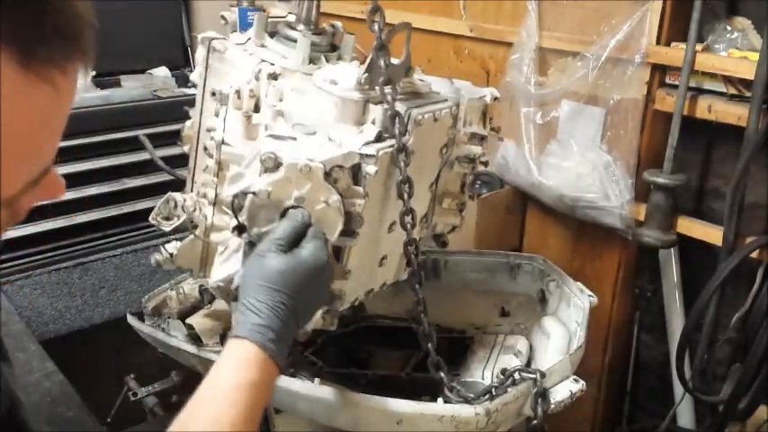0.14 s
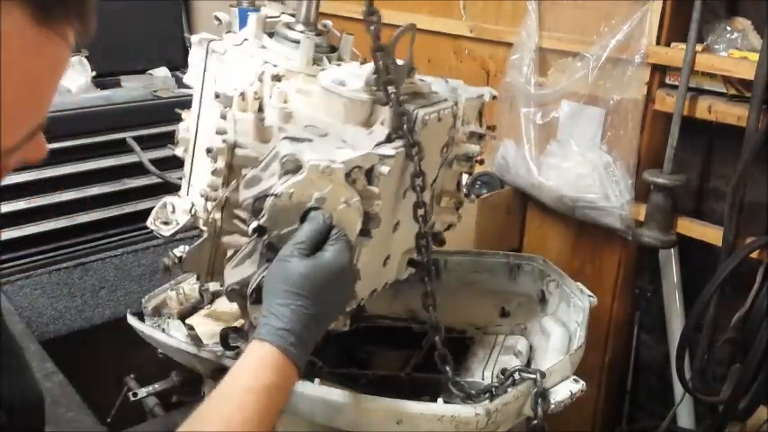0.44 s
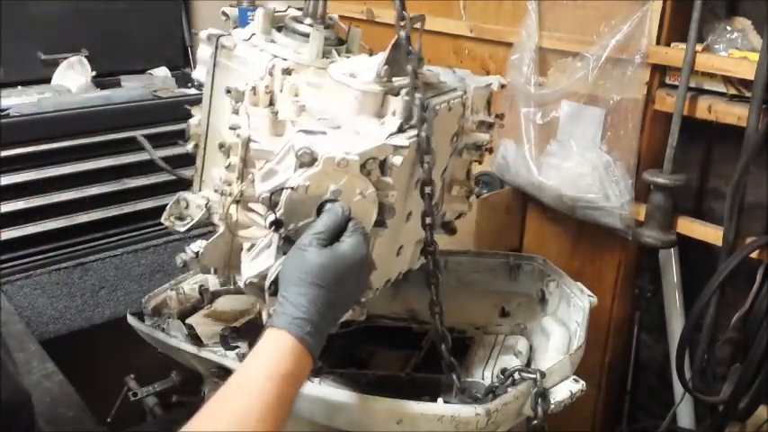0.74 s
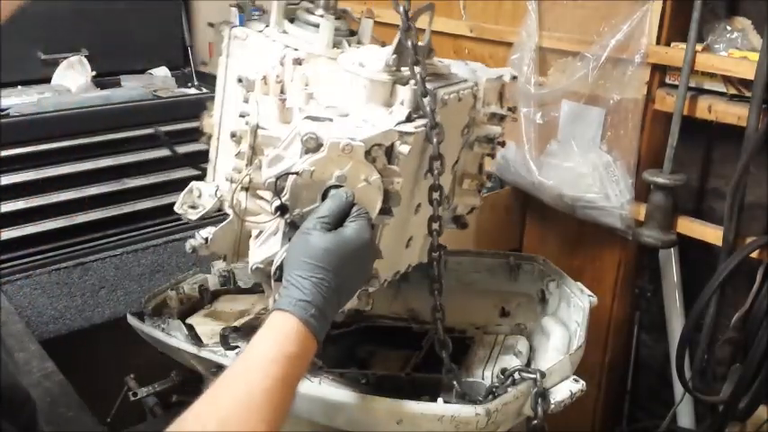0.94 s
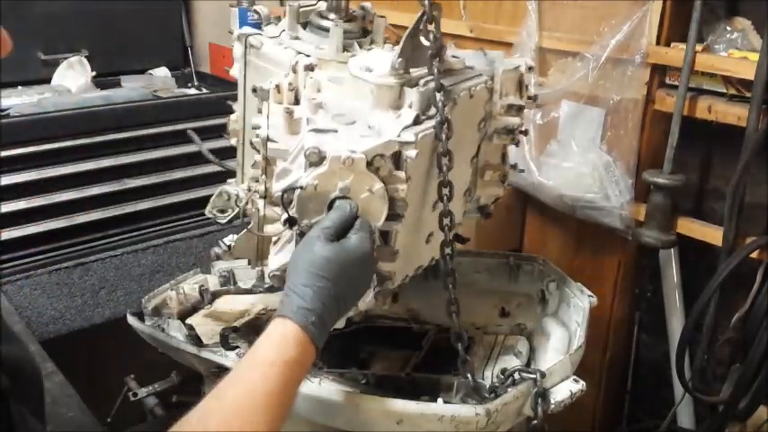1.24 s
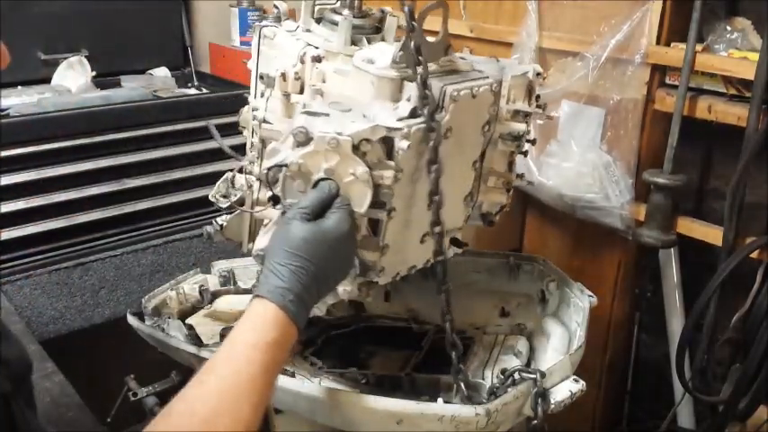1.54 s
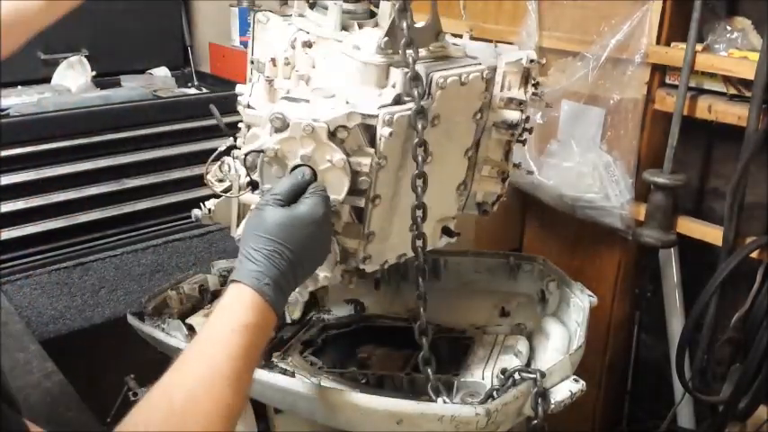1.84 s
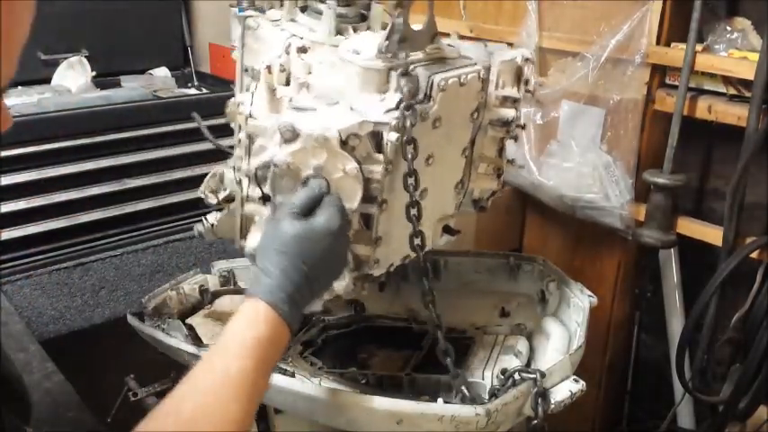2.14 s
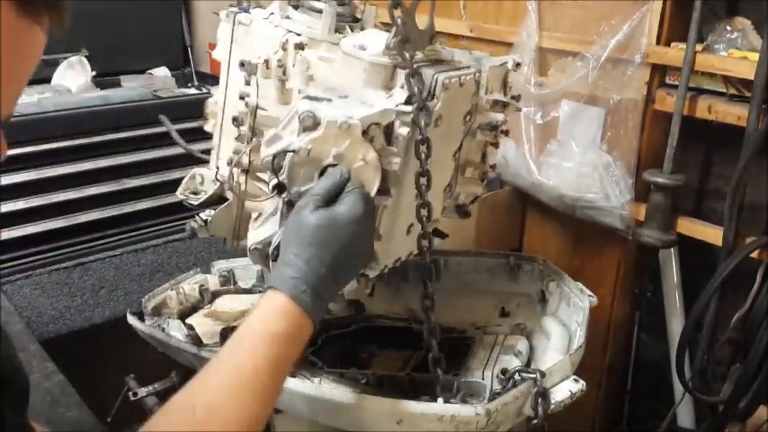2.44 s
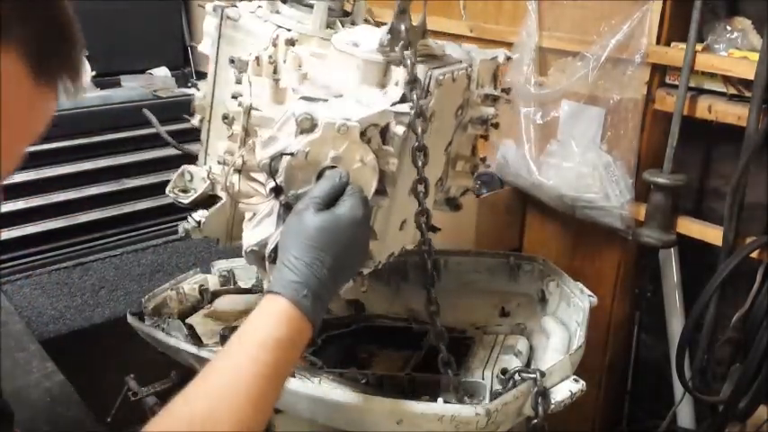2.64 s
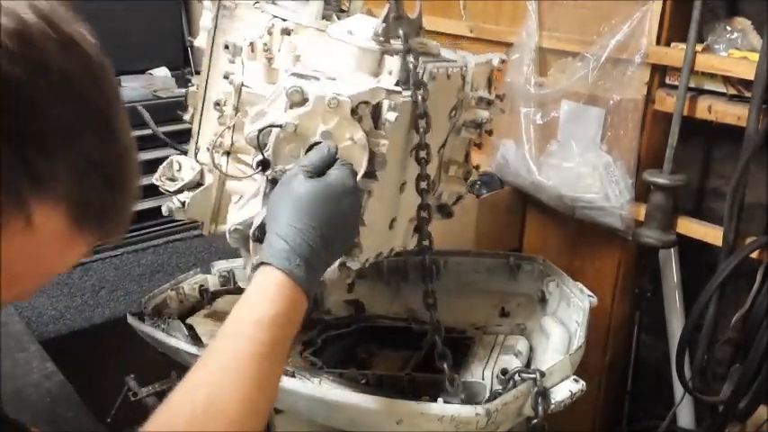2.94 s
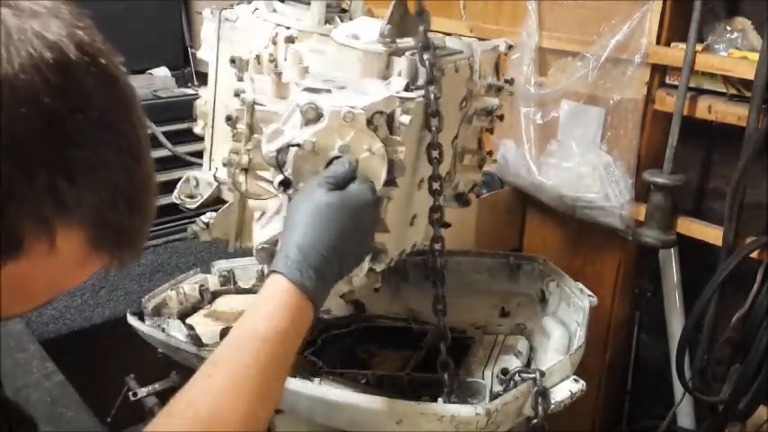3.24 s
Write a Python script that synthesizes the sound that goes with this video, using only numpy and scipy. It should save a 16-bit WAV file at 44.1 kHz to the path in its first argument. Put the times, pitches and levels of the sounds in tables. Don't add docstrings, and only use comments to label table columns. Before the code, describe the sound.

A chain hoist ratchets under load. A faint metallic tail opens; a low beam thump at 0.15 s leads to sharp clinks from 0.3 to 0.6, loudest first. Links rattle at 0.8-1.0, snap at 1.15-1.45, clink and rattle at 1.7-1.9, crack at 2.1-2.45, rattle at 2.7-2.9, and clank at 3.2. Dull jolts rumble beneath each stroke; small garage, short tail, quiet floor.

```python
import sys
import numpy as np
from scipy import signal
from scipy.fft import rfft, irfft
from scipy.io import wavfile
from scipy.ndimage import uniform_filter1d

SR = 44100
rng = np.random.default_rng(int(sys.argv[2]) if len(sys.argv) > 2 else 0)


def file_out(sig):
    cols = np.atleast_2d(sig).T
    lim = np.clip(cols, -1, 1)
    pcm = np.round(lim * 32767).astype(np.int16)
    wavfile.write(sys.argv[1], SR, pcm)


def undo_db(level):
    steps = np.asarray(level, float) / 20
    return 10 ** steps


N = 149940

# pitch_hz, level_db, t60_s
LINK_MODES = [(1060, -15, 0.26), (2730, -3, 0.23), (3200, -10, 0.23), (4270, -15, 0.3), (5700, -20, 0.15),
              (7350, -4.5, 0.23), (9280, -15, 0.31)]
# pitch_hz, level_db
STEEL = [(290, 3.5), (500, -8.5), (1480, -5), (2040, -10), (2540, 1.5), (3110, -7), (5240, -0.5),
         (14900, -13), (16000, -52)]


def evened(x):
    return x / np.sqrt(np.mean(x ** 2) + 1e-20)


def read(points, hz):
    f, value = np.transpose(points)
    return np.interp(np.log(hz + 1), np.log(f + 1), value)


def add(mix, start_s, sound):
    part = mix[round(start_s * SR):][:len(sound)]
    part += sound[:len(part)]


def high(x, hz):
    return signal.sosfilt(signal.butter(3, hz, "high", fs=SR, output="sos"), x)


def coloured(count, points, bright_db=0, lead_hz=5500, focus_db=0, patch_db=0):
    hz = np.fft.rfftfreq(count, 1 / SR)
    tilt = bright_db * np.clip((hz - 6500) / 3000, 0, 1)
    tilt = tilt + focus_db * np.exp(-((hz - lead_hz) / 900) ** 2)
    luck = rng.standard_normal(len(hz))
    broad = evened(uniform_filter1d(luck, 120))
    fine = evened(uniform_filter1d(luck[::-1], 12))
    tilt = tilt + patch_db * evened(broad + fine)
    spectrum = rfft(rng.standard_normal(count)) * undo_db(read(points, hz) + tilt)
    return evened(irfft(spectrum, count))


def bell(pitch_hz, level_db, t60_s):
    t = np.arange(9000) / SR
    onset = 1 - np.exp(-t / 0.0011)
    return undo_db(level_db - 60 * t / t60_s) * np.sin(2 * np.pi * pitch_hz * t) * onset


def blow(pitch_hz, level_db, width_s):
    t = np.arange(600) / SR
    pulse = (t / width_s) * np.exp(1 - t / width_s)
    return undo_db(level_db) * np.sin(2 * np.pi * pitch_hz * t) * pulse


def strike(modes, peak_db, bright_db, rattle_s, clatter_db, clatter_t60, crack_db, share=0.077,
           lead_hz=5500, focus_db=0, grain_db=3):
    t = np.arange(9000) / SR
    ring_s, smear, spread_db = 0.036, 0.025, 13
    group = modes * 4
    luck = np.clip(rng.standard_normal((len(group), 2)), -1, 1)
    ring = np.zeros(len(t))
    for (hz, db, t60), (louder, sharper) in zip(group, luck):
        decay = undo_db(db + spread_db * louder - 60 * t / min(t60, ring_s))
        ring += decay * np.sin(2 * np.pi * hz * (1 + smear * sharper) * t)
    ring *= 1 - np.exp(-t / 0.00029)

    rebounds = rng.standard_normal(2000) * (rng.random(2000) < share)
    contacts = 0.5 * rebounds * np.exp(-t[:2000] / rattle_s)
    contacts[0] = 1
    rung = signal.fftconvolve(ring, contacts)[:len(t)]

    clatter = undo_db(clatter_db - 60 * np.maximum(t - rattle_s, 0) / clatter_t60)
    crack = undo_db(crack_db - 60 * t / 0.008)
    noise = coloured(len(t), STEEL, bright_db, lead_hz, focus_db, patch_db=2.8)
    grains = undo_db(grain_db * evened(uniform_filter1d(rng.standard_normal(len(t)), 60)))
    noise = noise * grains * (clatter + crack) * np.minimum(t / 0.00034, 1)
    sound = rung / abs(rung).max() + noise
    return undo_db(peak_db) * sound / abs(sound).max()


def quiet_floor():
    # pitch_hz, level_db
    floor_points = [(15, 11), (25, 2.5), (123, 6), (641, -4), (2760, -13), (3920, -23.5), (5880, -16),
                    (14800, -52), (16000, -26)]
    return undo_db(-41.5 - 1.5) * coloured(N, floor_points)


def earlier_clank():
    t = np.arange(N) / SR
    return undo_db(-32.5 - 60 * t / 0.5) * coloured(N, STEEL, bright_db=-15.5)


def garage(x):
    # pitch_hz, t60_s
    decay_points = [(200, 0.52), (1000, 0.46), (3000, 0.46), (6000, 0.38), (12000, 0.25)]
    taps = np.zeros(SR)
    at = np.arange(200, SR - 20, 20)
    taps[at + rng.integers(0, 20, len(at))] = rng.choice([-1., 1.], len(at))
    hz, t, bands = signal.stft(taps, SR, nperseg=256)
    decay = undo_db(-60 * t / read(decay_points, hz)[:, None])
    tail = signal.istft(bands * decay, SR, nperseg=256)[1]
    return signal.fftconvolve(x, tail / np.linalg.norm(tail))[:N]


def early_echoes(direct):
    # start_s, level_db
    reflections = [
        (.0042, -12),
        (.009, -11.5),
    ]
    out = np.zeros(N)
    for start_s, level_db in reflections:
        add(out, start_s, undo_db(level_db) * direct)
    return out


def shudders():
    # start_s, peak_db, pitch_hz
    beam_shudders = [(0.159, -21, 164.5), (0.184, -32, 158), (0.203, -25, 143), (0.222, -24.5, 145),
                     (0.258, -21, 205), (0.286, -28, 168), (0.306, -34, 195), (0.324, -29.5, 204),
                     (0.354, -28.5, 181.5), (0.617, -22.5, 159), (0.629, -24.5, 154), (0.645, -25, 178),
                     (1.079, -29.5, 119), (1.176, -32.0, 139), (1.232, -27.5, 141), (1.332, -27.5, 190),
                     (1.56, -23, 215), (1.59, -23.5, 210), (1.626, -30.5, 213), (2.061, -22, 114),
                     (2.083, -24.5, 155), (2.115, -24.5, 134), (2.155, -31, 138), (2.181, -27.5, 130),
                     (2.201, -32.5, 167), (2.214, -29, 174), (2.233, -27, 182), (2.257, -46, 202),
                     (2.274, -30, 147), (2.321, -35, 174.6), (2.56, -29, 178), (2.589, -22.5, 144.6),
                     (2.605, -30, 164), (2.837, -30.5, 155), (3.043, -22, 129), (3.064, -28, 107),
                     (3.102, -29, 142), (3.135, -29.5, 183), (3.166, -30.5, 117), (3.249, -29.0, 119),
                     (.149, -22.5, 131.6),
    ]
    events = beam_shudders
    t, out = np.arange(3000) / SR, np.zeros(N)
    swell_s = 0.00902
    swell = ((t / swell_s) * np.exp(1 - t / swell_s)) ** 2
    for (start_s, peak_db, pitch_hz), turns in zip(events, rng.random((len(events), 3))):
        lump = np.zeros(len(t))
        for (ratio, level_db), turn in zip([(0.65, -4.5), (1.0, -1), (1.9, -11.5)], turns):
            lump += undo_db(level_db) * np.sin(2 * np.pi * (pitch_hz * ratio * t + turn))
        add(out, start_s - 1.502 * swell_s, undo_db(peak_db - 3.5) * swell * lump)
    return out


def beam():
    # start_s, level_db, shake_s, upper_modes_db, rub_db
    strokes = [(.142, -30, 0.21, 4, -42.5), (0.603, -33, 0.073, -7, -68), (1.065, -35.5, .17, -9, -60),
               (1.3, -50, 0.2, 21, -44), (1.551, -29, 0.037, 15, -47), (2.051, -31.5, 0.18, 1.5, -43.5),
               (2.22, -39, 0.164, 10, -53), (2.552, -30, 0.035, 14, -48), (2.719, -49, 0.22, -12, -45),
               (3.03, -30.5, 0.13, -3.5, -44.5), (3.242, -36, 0.033, 10, -44)]
    # pitch_hz, level_db, t60_s
    beam_modes = [(92.5, 1, 0.23), (155, -5, 0.064), (209, 3.5, 0.045), (260, -4.5, 0.021),
                  (443, -18, 0.057)]
    # pitch_hz, level_db
    rub_points = [(350, 12), (550, 0.5), (1100, 8), (2200, -15.5), (4000, -42)]
    t, out = np.arange(SR // 2) / SR, np.zeros(N)
    for start_s, level_db, shake_s, upper_db, rub_db in strokes:
        hold = np.minimum(t / 0.0021, 1) * np.clip((shake_s - t) / 0.016, 0, 1)
        body = np.zeros(len(t))
        for hz, mode_db, t60 in beam_modes:
            decay = undo_db(mode_db + upper_db * (hz > 120) - 60 * t / t60)
            body += decay * np.sin(2 * np.pi * hz * t) * (1 - np.exp(-t / 0.001))
        force = rng.standard_normal(len(t)) * hold
        force[0] += 10
        shake = signal.fftconvolve(force, body / np.linalg.norm(body))[:len(t)]
        grains = undo_db(3 * evened(uniform_filter1d(rng.standard_normal(len(t)), 300)))
        rub = hold * grains * coloured(len(t), rub_points)
        add(out, start_s, undo_db(level_db - 4.5) * shake + undo_db(rub_db) * rub)
    return out


def knocks(mix):
    # start_s, peak_db, centre_hz
    lever_stops = [(0.1335, -21.5, 2660), (.143, -36, 1500), (0.1749, -25, 1390), (0.19, -31, 1230),
                   (0.202, -36, 1120), (1.126, -35, 1660), (1.5505, -36, 2390), (2.062, -26, 1080),
                   (2.548, -20.5, 1960), (2.556, -34.5, 1500), (2.678, -61, 1660), (3.077, -33, 1010),
                   (2.406, -31, 1800)]
    # pitch_hz, level_db
    housing_points = [(300, -11), (900, -5), (2800, -4), (3600, -22), (5600, -10.5), (8000, -25),
                      (16000, -60)]
    t = np.arange(4000) / SR
    decay = undo_db(-60 * t / 0.019) + undo_db(-6 - 60 * t / 0.051)
    shape = decay * np.minimum(t / 0.00014, 1)
    for start_s, peak_db, centre_hz in lever_stops:
        thud = shape * coloured(len(t), housing_points, lead_hz=centre_hz, focus_db=3)
        add(mix, start_s - 0.001, undo_db(peak_db - 7) * thud)
        add(mix, start_s - 0.001, blow(centre_hz, peak_db - 5.5, 0.0011))


def ticks(mix):
    # start_s, peak_db, lead_hz, bright_db
    touches = [
        (0.4326, -20, 6920, -30),
        (0.7553, -30.5, 3300, -23),
        (1.5748, -36, 7030, -12),
        (2.0476, -28, 6140, -16),
        (2.0924, -21, 5890, -16),
        (2.678, -38, 6170, -1),
        (3.001, -34, 5760, -26),
        (3.027, -24, 4970, -16),
        (3.0764, -28.5, 6100, -14.5),
        (3.3558, -30.5, 5780, -15),
    ]
    for start_s, peak_db, lead_hz, bright_db in touches:
        tilt_db = np.clip(bright_db + 7, -15, 6)
        modes = LINK_MODES + [(lead_hz, 3, 0.08)]
        add(mix, start_s - 0.001, strike(modes, peak_db, tilt_db, 0.0077, -9.5, 0.095, -30))


def scrapes(mix):
    # start_s, peak_db, low_ring_db, bright_db, rattle_s
    drags = [(0.7776, -12.5, -8, -19, 0.019), (0.8492, -14, -32, -16.5, 0.02),
             (0.907, -13, -18, -16, 0.017), (0.9988, -13, -38, -16.5, 0.015),
             (1.7293, -13, -8.5, -19.5, 0.015), (1.7851, -15.5, -9, -14.5, 0.013),
             (1.8324, -11, -36, -18.5, 0.011), (1.8934, -15.5, -3, -16.5, 0.0039),
             (2.7047, -13, -2.5, -19, 0.012), (2.7635, -14.5, -32, -18, 0.014),
             (2.8345, -15.5, -31, -38, 0.0081), (2.8709, -24.5, -31, -22, 0.0069)]
    # pitch_hz, level_db, t60_s
    wheel_modes = [(1624, -11, 0.13), (2620, -3, 0.16), (3455, -1.5, 0.096), (4270, -21, 0.16),
                   (4860, -7.5, 0.31), (5400, -29, 0.24), (8000, -8, 0.12), (9100, -9, 0.39)]
    low_hz = 2450
    for start_s, peak_db, low_db, bright_db, rattle_s in drags:
        ring_db = peak_db + low_db
        add(mix, start_s, bell(low_hz, ring_db - 7.5, 0.1))
        add(mix, start_s, bell(0.96 * low_hz, ring_db - 2, 0.03))
        add(mix, start_s, bell(1470, peak_db - 34, 0.36))
        add(mix, start_s, strike(wheel_modes, peak_db, bright_db + 7.5, max(rattle_s, 0.001), -2.9, 0.085,
                                 -14, share=0.029, grain_db=2.5))


def contacts(mix):
    # start_s, peak_db, pitch_hz
    touches = [(0.7808, -16, 3320), (0.865, -19, 5200), (0.91, -16, 2620), (1.0019, -16, 5040),
               (1.2492, -9, 5290), (1.6366, -38, 5730), (1.794, -21, 6260), (1.815, -9.5, 6060),
               (1.823, -18, 5200), (2.0547, -26.5, 6100), (2.2025, -39, 5800), (2.266, -13, 5370),
               (2.296, -23, 2750), (2.8707, -23, 4410), (3.2065, -14, 6100)]
    for start_s, peak_db, pitch_hz in touches:
        at = start_s - 0.0006
        add(mix, at, blow(pitch_hz, peak_db - 5, 0.0006))
        add(mix, at, bell(pitch_hz, peak_db - 10, 0.03) + bell(1.3 * pitch_hz, peak_db - 17, 0.02))


def snaps(mix):
    # start_s, peak_db, lead_hz, low_ring_hz, low_ring_db
    tightenings = [(0.3029, -2.5, 5750, 2882, -11), (0.395, -10, 5690, 2781, -3),
                   (0.5119, -9, 5170, 2450, -7), (0.5206, -18.5, 7600, 2490, -46),
                   (1.2442, -6.5, 5550, 2420, -41), (1.3257, -5, 5310, 2867, -20),
                   (1.439, -6, 5840, 2890, -13), (2.2076, -5.5, 5300, 2390, -17),
                   (2.3073, -6, 8000, 2250, -22), (2.432, -8, 5540, 2810, -4.5),
                   (2.813, -5, 5670, 2450, -16), (3.1921, -6.5, 4860, 2720, -18)]
    for start_s, peak_db, lead_hz, low_hz, low_db in tightenings:
        modes = LINK_MODES + [(lead_hz, 4, 0.15), (low_hz, low_db - 9.5, 0.025)]
        add(mix, start_s, strike(modes, peak_db - 3, -7.5, 0.0039, -7.5, 0.11, -1.2, share=0.005,
                                 lead_hz=lead_hz, focus_db=0.5))
        at = start_s + 0.0004
        add(mix, at, blow(lead_hz, peak_db - 7, 0.00049))
        add(mix, at, blow(1.367 * lead_hz, peak_db - 11, 0.00019))
        add(mix, at, blow(low_hz, peak_db - 12.5, 0.00037))
        add(mix, start_s, bell(low_hz, peak_db + low_db - 7, 0.05))


def pawl(mix):
    # start_s, peak_db, lead_hz, low_ring_db, bell_db
    drops = [(0.2885, -13.5, 5920, -13, -15), (0.3676, -14, 6400, -31, -23),
             (0.4071, -14.5, 5800, -17, -23), (0.478, -24, 5600, -22, -14.5),
             (0.6027, -10.5, 5430, -24.5, -22.5), (0.8573, -12.5, 6030, -18, -30),
             (1.1582, -7, 5750, -16.5, -56), (1.6822, -6, 5670, -18.5, -22.5),
             (1.8129, -10, 5800, -19.5, -23.5), (2.137, -19.5, 5600, -19.5, -18.5),
             (2.2575, -7.5, 5880, -45, -46), (3.1885, -12.5, 5960, -18.5, -23)]
    # pitch_hz, level_db, t60_s
    pawl_modes = [(4670, -0.5, 0.12), (5140, -2, 0.18), (5300, -26, 0.32), (5880, -1, 0.2),
                  (6300, -2, 0.087), (7200, -4, 0.13)]
    low_hz, bell_hz = 2810, 1173
    for start_s, peak_db, lead_hz, low_db, bell_db in drops:
        at = start_s - 0.001
        modes = pawl_modes + [(lead_hz, 5, 0.1)]
        add(mix, at, strike(modes, peak_db, -8, 0.0025, -6.5, 0.046, -21, share=0.035,
                            lead_hz=lead_hz, focus_db=20.5))
        add(mix, start_s - 0.0007, blow(lead_hz, peak_db - 8.5, 0.0012))
        add(mix, at, bell(low_hz, peak_db + low_db + 12, 0.024))
        add(mix, at, bell(bell_hz, peak_db + bell_db + 5.5, 0.055))


def scene():
    hard, loose = np.zeros(N), np.zeros(N)
    knocks(loose)
    ticks(loose)
    scrapes(loose)
    contacts(hard)
    snaps(hard)
    pawl(hard)
    hard, loose = high(hard, 840), high(loose, 535)
    low = high(beam() + shudders(), 64)
    steel = hard + loose
    room = undo_db(-8.5) * (garage(hard) + garage(loose)) + undo_db(-7.5) * garage(low)
    mix = steel + low + early_echoes(steel) + room + earlier_clank() + quiet_floor()
    return mix[None]


def band_limit(x):
    return signal.sosfilt(signal.butter(12, 16650, fs=SR, output="sos"), x)


def record(dry):
    dry = dry + undo_db(-62.5) * rng.standard_normal(dry.shape)
    edge_hz, top_hz, spill = 15450, 16700, 0.04
    edge, top = [signal.oaconvolve(dry, signal.firwin(511, hz, window="blackman", fs=SR)[None], "same")
                 for hz in (edge_hz, top_hz)]
    return band_limit(edge + spill * (top - edge))


dry = scene()
out = record(dry)
file_out(out)
```